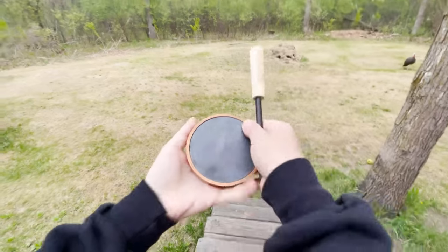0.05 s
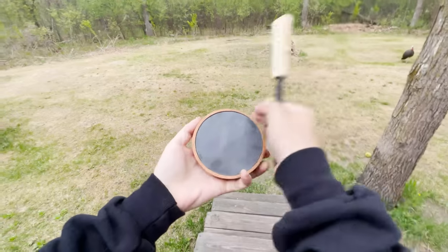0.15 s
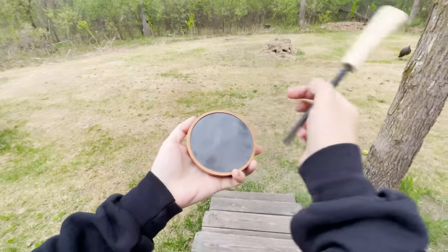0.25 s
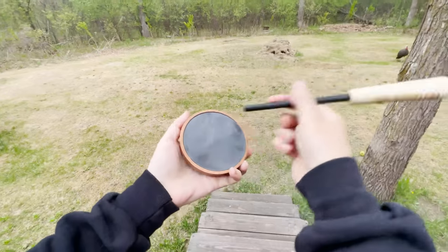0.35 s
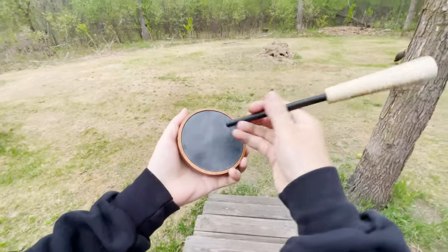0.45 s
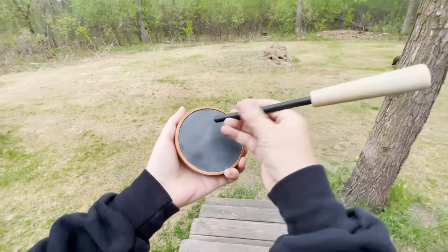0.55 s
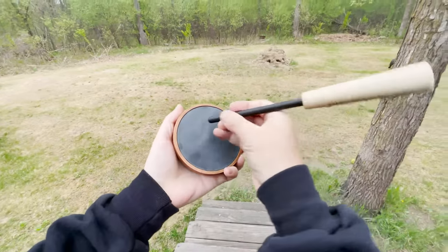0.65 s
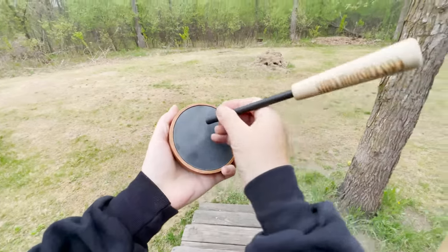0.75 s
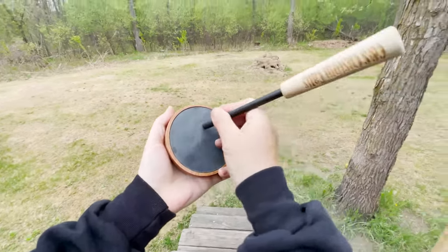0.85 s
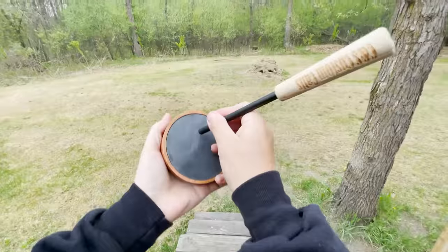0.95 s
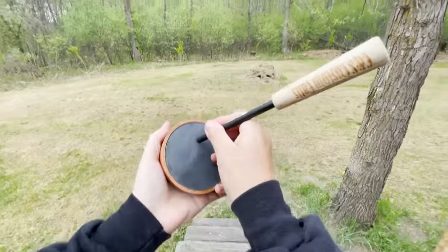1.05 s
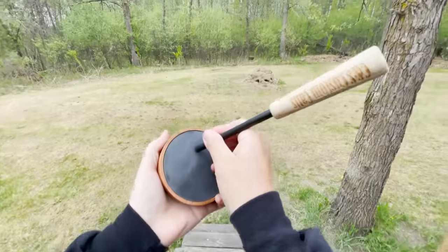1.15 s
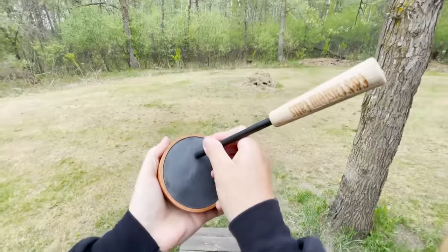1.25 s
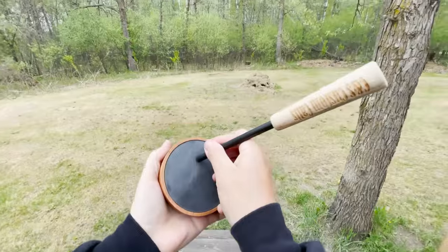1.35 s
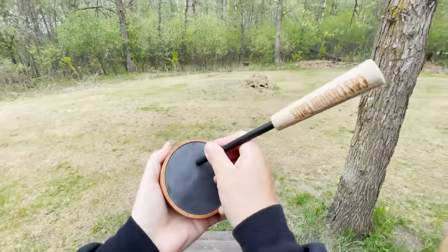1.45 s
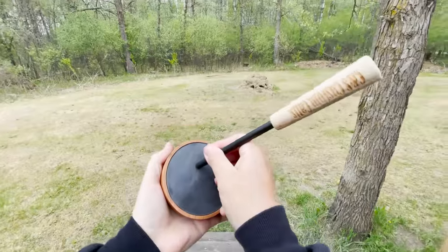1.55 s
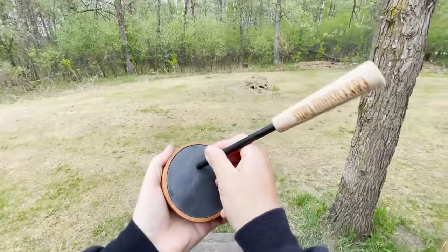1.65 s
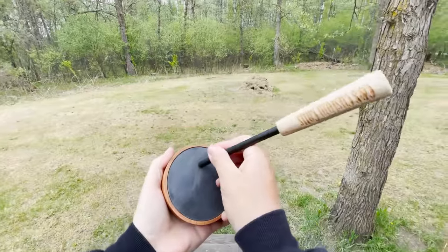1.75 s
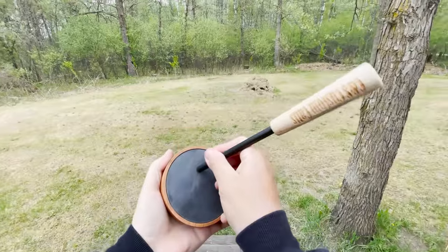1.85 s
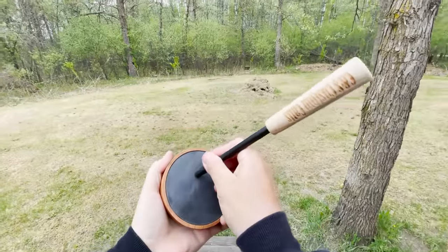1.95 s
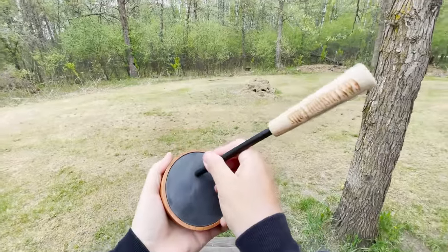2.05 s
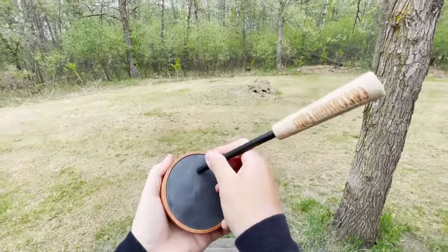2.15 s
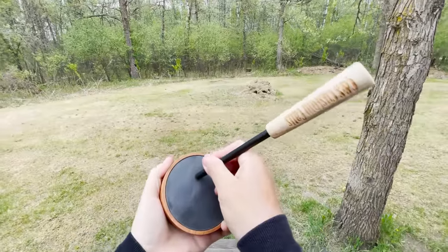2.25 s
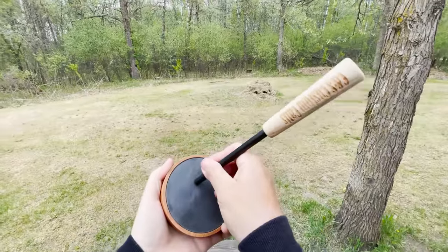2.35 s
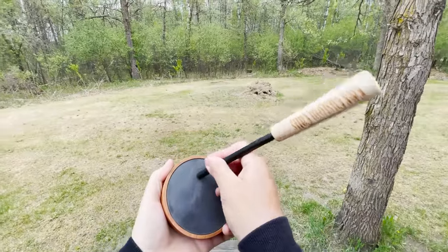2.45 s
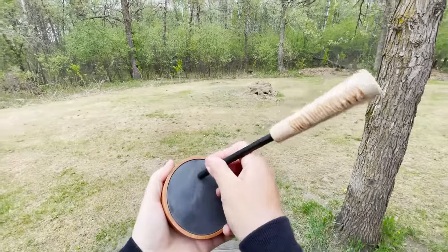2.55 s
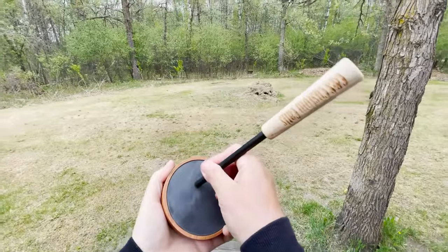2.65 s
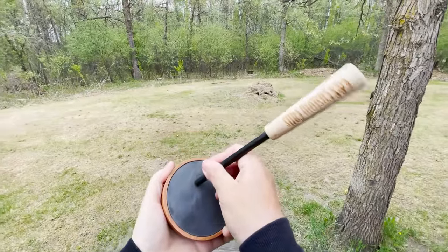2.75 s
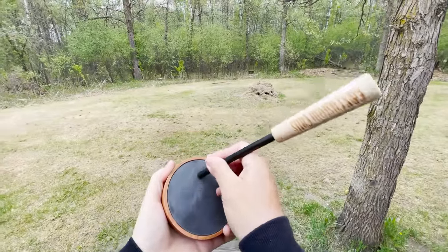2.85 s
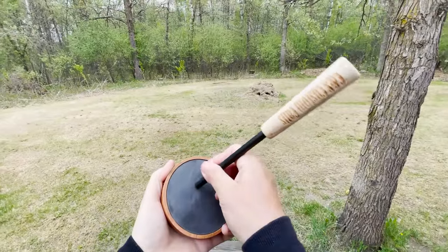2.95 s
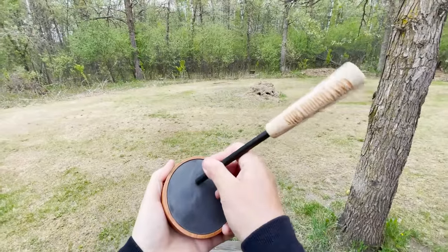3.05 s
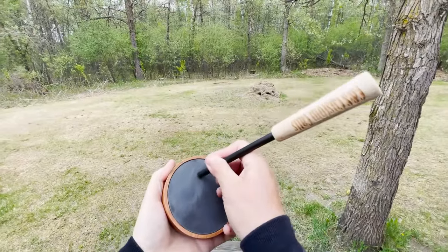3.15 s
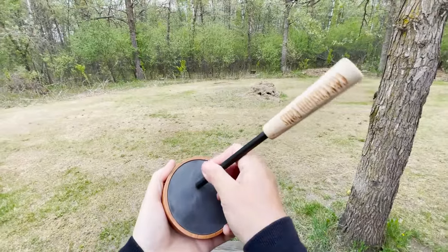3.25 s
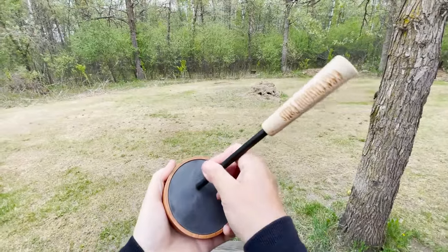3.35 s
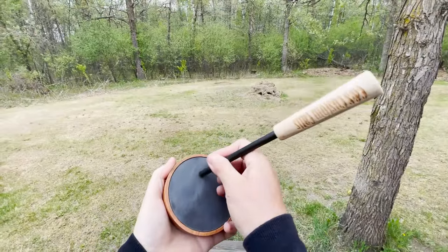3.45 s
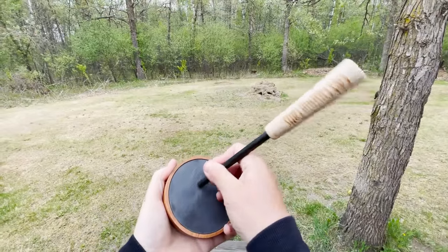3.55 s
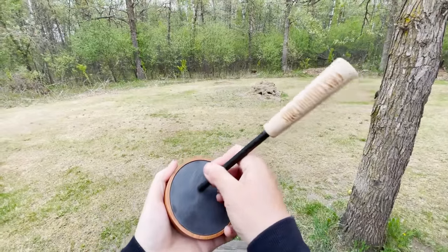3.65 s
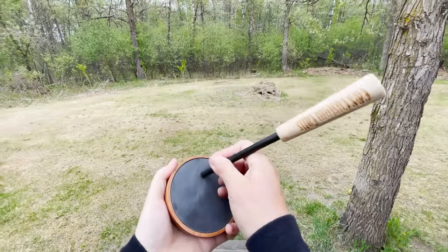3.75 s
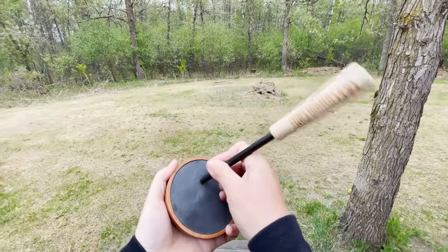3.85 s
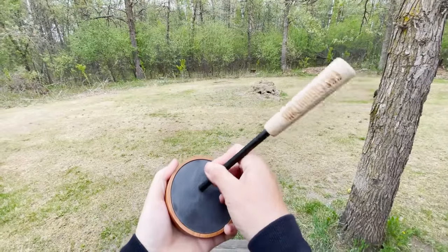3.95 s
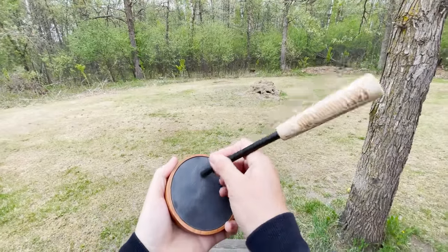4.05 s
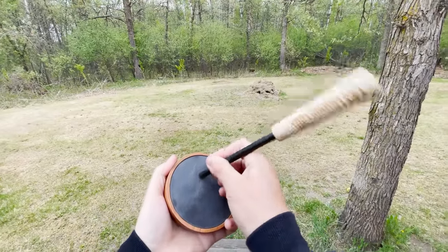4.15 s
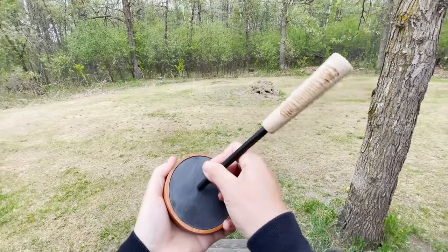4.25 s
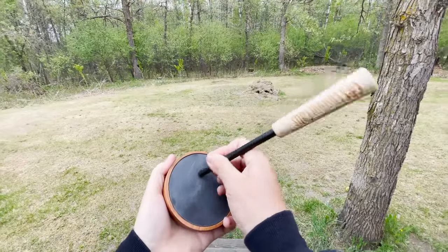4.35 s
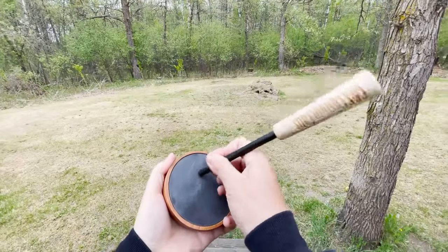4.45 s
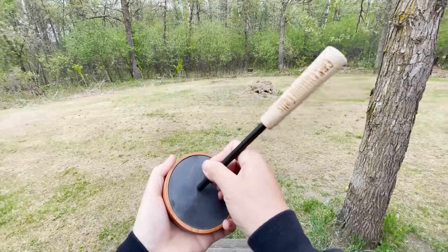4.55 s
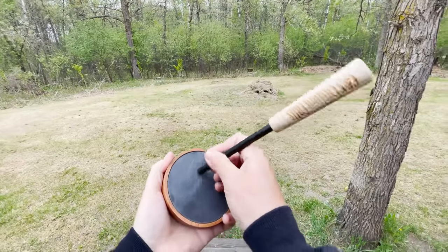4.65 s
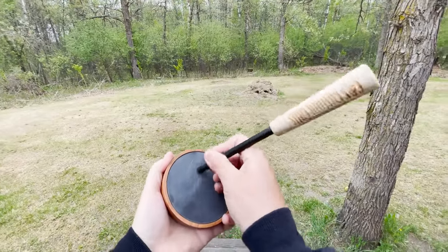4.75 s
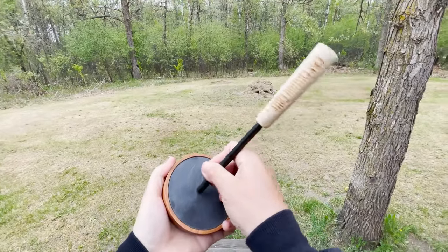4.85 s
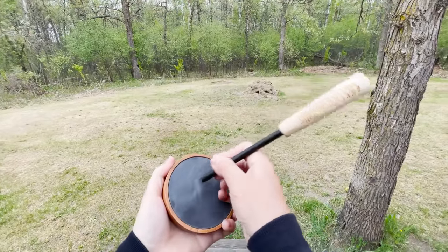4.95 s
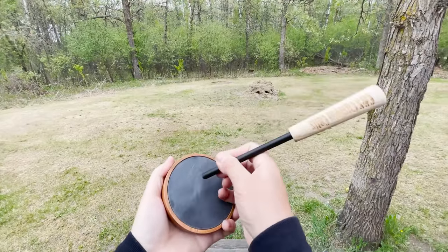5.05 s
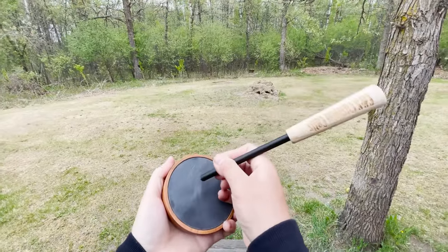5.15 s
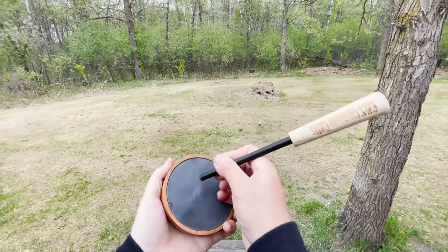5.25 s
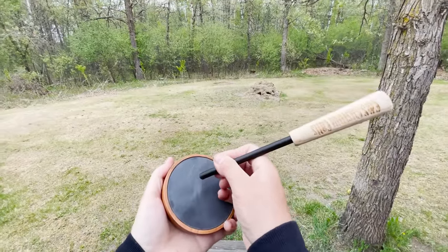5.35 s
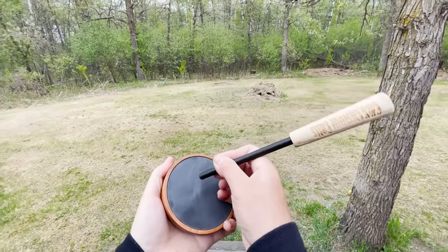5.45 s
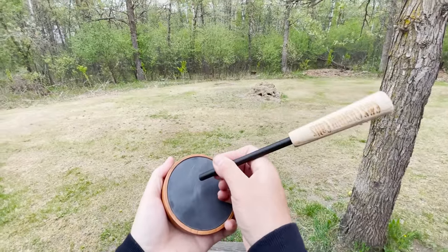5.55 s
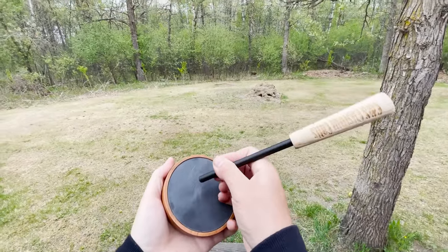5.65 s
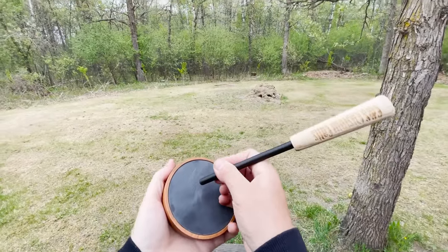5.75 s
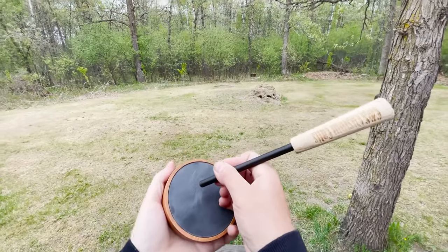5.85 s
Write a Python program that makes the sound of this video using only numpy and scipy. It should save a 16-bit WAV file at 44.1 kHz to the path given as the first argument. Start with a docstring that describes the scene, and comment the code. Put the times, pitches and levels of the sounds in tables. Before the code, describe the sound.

After faint brushing and a small tap, a friction turkey call yelps eleven times outdoors, each thin squeak breaking into a hoarse lower note.

```python
"""A wooden striker works a hand-held pot call in a quiet yard.
Skin and cloth brush as the grip is found, low wind and bumps touch the microphone, and the tip is set down.
Eleven turkey yelps follow, growing quicker and louder, by stick-slip friction driving the pot's resonances:
a thin high note breaks to a raspy lower one and flips up at the let-go; the tip hisses softly back between yelps.
Deck and trees return faint echoes; two faint far notes and a low drone come through at the end."""
import sys
import numpy as np
from scipy import signal
from scipy.fft import rfft, irfft
from scipy.io import wavfile

SR = 44100
rng = np.random.default_rng(int(sys.argv[2]) if len(sys.argv) > 2 else 0)


def put_to_file(sound):
    """Save the sound as 16-bit audio at rate SR, in the file named by the first command-line argument."""
    columns = np.atleast_2d(sound).T  # one column per channel
    safe = np.clip(columns, -1, 1)
    whole_steps = np.round(safe * 32767)
    wavfile.write(sys.argv[1], SR, whole_steps.astype(np.int16))


N = 260631
TIME, HZ = np.arange(N) / SR, np.fft.rfftfreq(N, 1 / SR)

# one stroke a yelp; the high note precedes the break, then the hand presses, holds and eases:
# break_s, high_note_s, press_s, hold_s, break_to_let_go_s, level_db, high_level_db, high_pitch_hz,
# rasp (0-1), hardness_db (steers the treble shelves)
YELPS = [(1.394, 0.0046, 0.039, 0.021, 0.16, -23, -37, 743, 0.63, -7),
         (1.818, 0.0099, 0.038, 0.011, 0.11, -17.5, -29, 853, 0.9, -8.5),
         (2.209, 0.023, .015, 0.021, 0.11, -16, -28, 935, .78, -10),
         (2.538, 0.019, .020, 0.062, 0.12, -16, -26.5, 959, 0.71, -7.5),
         (2.887, .027, 0.017, 0.032, 0.1, -14.5, -26, 915, .9, -4),
         (3.217, 0.019, 0.022, 0.011, 0.096, -13.5, -25.5, 975, 0.91, -3.3),
         (3.544, 0.019, .012, 0.018, 0.077, -12.5, -20.5, 988, 1, -0.5),
         (3.87, .034, 0.013, 0.009, 0.077, -12, -30, 1002, 0.86, -1),
         (4.179, .027, .012, 0.011, .068, -11.5, -23.5, 969, .8, 0.5),
         (4.486, .014, 0.0099, .018, 0.066, -12, -20.5, 945, 0.85, 0.5),
         (4.811, .024, 0.011, 0.027, 0.056, -12, -29.5, 956, 0.89, 0.5)]
# at full pressure the tip may catch in a slower cycle: middle_s, length_s, slip_rate_hz, rasp (0-1)
CATCHES = [(2.249, 0.024, 519, 0.17), (2.586, 0.018, 525.4, 0.3), (2.608, 0.0051, 561, 0.5),
           (2.626, 0.0087, 591, 0.4), (2.922, .008, 536.7, .44), (2.952, 0.0078, 586, 0.76),
           (3.264, 0.01, 607, 0.94), (3.592, 0.0096, 570, 0.4), (3.898, .008, 527, 0.3),
           (4.212, 0.0094, 535, 0.45), (4.51, 0.0094, 566.3, 1), (4.824, .006, 539.5, 0.64)]
# resonances of plate and pot: centre_hz, width_hz, relative_level_db
POT_MODES = [(467.4, 100, -9.5), (690, 260, -13), (1073, 107, 2.5), (1146, 60, -29.5), (1375, 170, -3),
             (1676, 234, 1.5), (1830, 71, 2), (1967, 122, 5.5), (2660, 240, -8), (2943, 200, -3),
             (3240, 310, -5), (3740, 380, -10), (4255, 360, -12.5), (4946, 340, -15), (6110, 320, -12.5),
             (6650, 670, -21), (8435, 1000, -24), (11125, 1050, -18.5), (15400, 600, -43.5)]
# paths from plate to the two microphones: frequency_hz, left_minus_right_db, left_lead_rad
MICROPHONE_PATHS = [(450.0, -0.2, -0.1), (660.0, -0.3, -0.1), (1060.0, 4.0, -0.8), (1370.0, -1.9, -1.4),
                    (1720.0, -0.9, -0.7), (1980.0, 2.3, -1.0), (2700.0, 0.8, -2.0), (3300.0, -4.4, -2.2),
                    (3740.0, -4.2, -2.0), (4300.0, -5.2, -2.9), (5000.0, 1.5, -5.6), (6150.0, -13.2, -6.7),
                    (6700.0, -7.3, -8.2), (8400.0, -8.7, -7.6), (10500.0, 0.0, -6.2), (11100.0, -0.5, -5.8),
                    (11700.0, -0.5, -5.0), (15400.0, 0.5, -6.3)]
# long ringing modes of the striker: pitch_hz, gain_at_resonance_db, t60_s
STRIKER_MODES = [(1350, -35, .3), (1705, -40, .3), (2688, -15, .35)]
# the tip sliding back: middle_s, length_s, peak_level_db
RETURNS = [(1.662, 0.14, -53), (2.06, 0.15, -51.5), (2.43, .14, -49), (2.766, 0.12, -49.5),
           (3.094, 0.14, -50.5), (3.419, 0.11, -48), (3.726, 0.15, -50.5), (4.036, 0.12, -50.5),
           (4.351, 0.17, -53), (4.652, .16, -51)]
# modes of the lightly touched plate: pitch_hz, relative_level_db, t60_s
TOUCH_MODES = [(600, -19, .04), (1060, -10, .04), (1165, -7, .04), (1690, -5, .025), (1865, 0, .042),
               (3050, -24, .02)]
# fingers and sleeves brushing: middle_s, length_s, centre_hz, peak_level_db
BRUSHES = [(0.029, 0.096, 6220, -57.5), (.425, 0.0045, 11300, -50), (.59, .14, 10400, -69.5)]
# spectrum of the yard's wash: frequency_hz, relative_level_db
YARD_COLOUR = [(50, -15.5), (120, -5.5), (250, -4), (400, -2), (950, -5), (1200, -12), (2200, -11.5),
               (3400, -13), (4900, -16), (5600, -20.5), (6200, -16), (6800, -22.5), (7400, -29),
               (8500, -28.0), (11200, -29.5), (12800, -40), (15800, -49.5)]
# level of the yard's wash: time_s, level_db
YARD_LEVEL = [(0, -55.5), (1.2, -54.5), (3, -54.5), (4.9, -57.5), (5.91, -56)]
# left-right likeness of the wash: frequency_hz, likeness (-1 to 1)
YARD_LIKENESS = [(60, -0.31), (180, 0.56), (550, 0.02), (1650, -0.31), (4970, -0.19), (15000, 0.19)]
# spectrum of wind on the microphone: frequency_hz, relative_level_db
WIND_COLOUR = [(12, -40.5), (20, -15), (40, -4), (59, 8.5), (140, -5), (170, -3), (220, -35.5), (370, -120)]
# a light breeze: time_s, level_db
BREEZE = [(0, -72.5), (2.5, -62), (3.5, -79.5), (4.8, -73.5), (5.9, -86)]
# gusts on top of the breeze: middle_s, length_s, peak_level_db
GUSTS = [(.25, 0.19, -74), (.85, 0.26, -61), (1.37, 0.52, -53), (1.69, 0.23, -54), (2.25, .7, -57),
         (4.53, .18, -55)]
# soft bumps of wind and handling: middle_s, length_s, peak_level_db
BUMPS = [(0.24, 0.047, -48.5), (1.28, 0.027, -42.5), (1.335, 0.039, -50), (1.4, 0.02, -38),
         (4.518, 0.064, -52), (4.83, .07, -61)]
# spectrum of the bumps: frequency_hz, relative_level_db
BUMP_COLOUR = [(20, -18), (55, -2.5), (100, -6), (200, -14), (400, -26), (1500, -70.5)]
# level of a far low drone: time_s, level_db
DRONE_LEVEL = [(0, -81), (4.9, -70.5), (5.35, -70.5), (5.5, -68), (5.7, -63), (5.91, -64)]
# faint far notes: middle_s, length_s, pitch_hz, peak_level_db
FAR_NOTES = [(5.32, .13, 1590, -66), (5.43, .07, 1570, -69)]

# the thin high note fades in, sinks, and breaks down to the low one
SINK_HZ_PER_S, ATTACK_S, ATTACK_DB, BREAK_S = 4800, .007, -21, .011
# the low note starts sharp and settles, is dragged flat by chatter, and climbs as the hand eases
LOW_HZ, SHARP_HZ, SETTLE_S, CHATTER_HZ, CHATTER_POWER = 663.1, 38.4, .008, 33.76, 4
CLIMB_HZ, CLIMB_POWER = 21.14, 2.9
# level at the break and the let-go against full pressure; how level and rasp follow pressure
BREAK_DB, EASED_DB, LEVEL_POWER = -5.5, -7, 1.41
RASP_POWER, LIGHT_RASP = 2, .1  # LIGHT_RASP: rasp with no pressure
# as the hand lets go, the note flips up and dies
FLIP_HZ, FLIP_S, FLIP_POWER, FADE_DB_PER_S, RELEASE_S = 1023.2, .0125, 2.9, 1150.5, .024
CATCH_EDGE_S = .006
# rms judder in level at full rasp; rms treble spit before the shelves scale it; their middle rate
JUDDER_DB, SPIT_DB, JUDDER_HZ = 1.67, 1.55, 88.85
# treble accent just after the break, also before the shelves scale it
ACCENT_DB, ACCENT_AFTER_S, ACCENT_WIDTH_S = 1.5, .008, .016
TOUCH_AT_S, TOUCH_DB = 1.152, -31.5
CEILING, EDGE_HZ = .95, 15900  # amplitude limit; upper band edge


def yelp(row, response, grit_db=-18, scrape_db=-3, grit_decay=.2, bite_slope=1.0, loud_db=-16,
         rasp_db=-4.5, light_db=-29, round_db=-16):
    """Source-filter principle: stick-slip pulses and the grit of each slide excite the pot's resonances."""
    *motion, hardness_db = row
    t, level_db, hz, rasp = stroke(*motion)
    pulses, since_slip = slips(hz, rasp)
    # grit is strongest just after a slip; grit_decay is in cycles
    grit = evened((0.065 + np.exp(-since_slip / grit_decay)) * rng.standard_normal(len(t)))
    # the highest partials dissolve into scraping
    drive = shelf(pulses, 6000, db=-16.5)
    drive = drive + gain_of(grit_db) * grit + gain_of(scrape_db) * treble(grit, 3500)

    # a harder stroke sharpens each slip, up to a limit; a chattering tip loses contact and scrapes less
    bite_db = hardness_db + bite_slope * np.minimum(level_db - loud_db, 0) + rasp_db * rasp
    since_accent = t - row[0] - ACCENT_AFTER_S
    bite_db += ACCENT_DB * np.exp(-(since_accent / ACCENT_WIDTH_S) ** 2)
    bite_db += SPIT_DB * waver(t, JUDDER_HZ)
    drive = shelf(drive, 2400, 0.84 * bite_db + 1.5)
    drive = shelf(drive, 11000, 1.8 * bite_db)
    # hard chatter also shakes the whole pot
    drive = shelf(drive, 430, -2.2 * rasp * np.maximum(hardness_db, 0))
    # a very light touch rounds the slips to a near sine
    lightness = np.clip((light_db - level_db) / 7, 0, 1)
    drive = shelf(drive, 1200, round_db * lightness)

    sound = through(drive, response)
    # level the short-time power, then impose the stroke's own level
    window = signal.windows.hann(600)
    power = np.convolve((sound ** 2).mean(0), window / window.sum(), "same")
    level = gain_of(level_db + JUDDER_DB * rasp * waver(t, JUDDER_HZ))
    fade = signal.windows.tukey(len(t), .05)
    return t[0], sound / np.sqrt(power + 1e-12) * level * fade


def stroke(at, high_s, press_s, hold_s, length, db, high_db, high_hz, full_rasp):
    """Friction control: hand pressure governs the level, slip rate and rasp of one stroke."""
    t = np.arange(-high_s, length + RELEASE_S, 1 / SR)  # zero at the break
    ease_s = max(length - press_s - hold_s, .005)
    pressure = np.clip(np.minimum(t / press_s, (length - t) / ease_s), 0, 1)
    high = np.clip(-t / BREAK_S, 0, 1)  # share of the high note
    begun, let_go = t + high_s, np.maximum(t - length, 0)  # seconds since each

    level_db = db + np.where(t < press_s, BREAK_DB, EASED_DB) * (1 - pressure) ** LEVEL_POWER
    level_db += high * (high_db - level_db)
    level_db += ATTACK_DB * np.maximum(1 - begun / ATTACK_S, 0) - FADE_DB_PER_S * let_go

    rasp = LIGHT_RASP + (full_rasp - LIGHT_RASP) * pressure ** RASP_POWER
    hz = LOW_HZ + SHARP_HZ * np.exp(-np.maximum(t, 0) / SETTLE_S)
    hz -= CHATTER_HZ * abs(rasp) ** CHATTER_POWER
    hz += CLIMB_HZ * (t > press_s) * (1 - pressure) ** CLIMB_POWER
    flip = np.minimum(let_go / FLIP_S, 1) ** FLIP_POWER
    hz += high * (high_hz - SINK_HZ_PER_S * begun - hz) + (FLIP_HZ - hz) * flip

    for middle, span, slow_hz, slow_rasp in CATCHES:
        caught = np.clip(.5 + (span / 2 - abs(at + t - middle)) / CATCH_EDGE_S, 0, 1)
        hz = hz + caught * (slow_hz - hz)
        rasp = rasp + caught * (slow_rasp - rasp)
    return at + t, level_db, hz, np.clip(rasp, 0, 1)


def slips(hz, rasp, jitter=0.11, uneven=.5, scatter=0.059, lurch=0.12, count=256):
    """Stick-slip oscillation: irregular band-limited force pulses, and each sample's phase in its cycle."""
    turns, sample = np.cumsum(hz) / SR, np.arange(len(hz))
    slip = np.arange(1, int(turns[-1]))
    rough = np.clip(np.interp(slip, turns, rasp), .06, 1)
    # long and short slips nearly alternate
    swing = rough * unrest(count, turn=.44, memory=.9)[slip]
    # pressed hard, the tip also drags and catches up
    drag = rough ** 2 * unrest(count, turn=.14, memory=.8)[slip]
    stray = rough * rng.standard_normal(count)[slip]
    slip_turn = slip + jitter * swing + lurch * drag + scatter * stray
    at = np.sort(np.interp(slip_turn, turns, sample))
    force = np.exp(uneven * np.tanh(swing))  # a longer stick stores more force
    offset = sample[:, None] - at
    pulses = (np.sinc(offset) * (abs(offset) < 20)) @ force
    return evened(pulses), np.interp(sample, at, slip) % 1


def unrest(count, turn, memory):
    """Damped random oscillation: a two-pole recursion advances by a fraction of a turn from slip to slip."""
    r = np.clip(memory, 0, .97)
    kicks = rng.standard_normal(2 * count)
    swing = signal.lfilter([1], [1, -2 * r * np.cos(2 * np.pi * turn), r * r], kicks)
    return evened(swing[count:])


def waver(t, rate_hz, count=16):
    """Superposition: sines from half to twice a rate sum to a random wobble of rms 1."""
    spread, phase = rng.random((2, count, 1))
    rates = rate_hz * 2 ** (2 * spread - 1)
    return evened(np.sin(2 * np.pi * (rates * t + phase)).sum(0))


def pot_response(skirt=1.767, leak_db=-46, size=2048):
    """Modal resonance: minimum-phase impulse response of the pot, with level and phase for each microphone."""
    hz = np.fft.rfftfreq(size, 1 / SR)
    power = sum(gain_of(db) ** 2 / (1 + (2 * (hz - f) / width) ** 2) ** skirt
                for f, width, db in POT_MODES)
    power = power + gain_of(leak_db) ** 2 / (1 + (hz / 7500) ** 10)
    radiation = hz ** 2 / (hz ** 2 + 230 ** 2)  # a small pot radiates little bass
    log_gain = np.log(np.sqrt(power) * radiation + 1e-4)
    # minimum phase follows from the log gain by the Hilbert transform
    phase = -signal.hilbert(np.r_[log_gain, log_gain[-2:0:-1]]).imag[:len(hz)]
    centre, pan_db, lead = np.transpose(MICROPHONE_PATHS)
    side = np.array([[.5], [-.5]])
    paths = gain_of(side * np.interp(hz, centre, pan_db)) * np.exp(1j * side * np.interp(hz, centre, lead))
    # time zero sits mid-buffer, as the centred convolution expects
    return np.roll(irfft(np.exp(log_gain + 1j * phase) * paths), size // 2, axis=1)


def through(x, response):
    """Linear filtering: a force on the plate is convolved with the pot's response."""
    return signal.fftconvolve(np.array([x, x]), response, "same", axes=1)


def striker(x):
    """Sympathetic resonance: narrow modes of the rod ring on after each stroke."""
    t = np.arange(SR // 2) / SR
    ring = 0
    for hz, db, t60 in STRIKER_MODES:
        unit_gain = 2 * np.log(1000) / (t60 * SR)
        ring = ring + gain_of(db - 60 * t / t60) * np.sin(2 * np.pi * hz * t) * unit_gain
    return signal.fftconvolve(x, ring[None], axes=1)[:, :N]


def sliding_hiss(response, bright_db=13):
    """Sliding friction: without pressure there are no slip cycles, only grit noise through the pot."""
    grit = rng.standard_normal(N)
    hiss = evened(through(grit + gain_of(bright_db) * treble(grit, 6100), response))
    return hiss * swells(RETURNS)


def touch(rise=0.00091):
    """Impulse excitation: a light knock of the tip sets off decaying plate modes (rise in s)."""
    t = np.arange(SR // 5) / SR
    ring = sum(gain_of(db - 60 * t / t60) * np.sin(2 * np.pi * hz * t) for hz, db, t60 in TOUCH_MODES)
    return TOUCH_AT_S, gain_of(TOUCH_DB) * ring * (1 - np.exp(-t / rise))


def echo(x, db, t60, dull_hz, delay):
    """Multiple reflection: sparse random-sign taps, low-passed and decaying, follow after a delay in s."""
    t = np.arange(SR) / SR
    signs = rng.choice([-1., 1.], (2, SR))
    present = rng.random((2, SR)) < 2000 / SR  # about 2000 reflections a second
    taps = signs * present * (t > delay) * gain_of(-60 * t / t60)
    low_pass = signal.butter(2, dull_hz, fs=SR, output="sos")
    taps = signal.sosfilt(low_pass, taps / np.linalg.norm(taps[0]))
    return gain_of(db) * signal.fftconvolve(x, taps, axes=1)[:, :N]


def brushes():
    """Rubbing friction: skin and cloth give short broad bands of noise."""
    return sum(gain_of(db) * swell(s, length) * noise([(hz / 6, -25), (hz, 0), (hz * 2.6, -20)], 0.31)
               for s, length, hz, db in BRUSHES)


def outdoors():
    """Random noise fields: the yard's wash, with low-frequency wind and bumps on the microphone."""
    wash = noise(YARD_COLOUR, read(YARD_LIKENESS, HZ)) * gain_of(np.interp(TIME, *np.transpose(YARD_LEVEL)))
    breeze = gain_of(np.interp(TIME, *np.transpose(BREEZE)))
    wind = noise(WIND_COLOUR, -.5) * (breeze + swells(GUSTS))
    bumps = noise(BUMP_COLOUR, -.3) * swells(BUMPS)
    return wash + wind + bumps


def distance():
    """Narrow-band noise: a low drone and two faint notes from far away."""
    colour = [(45, -36.0), (72, -2), (88, 4.0), (130, -31.0), (400, -91.5)]  # frequency_hz, relative_level_db
    drone = noise(colour, 0.6) * gain_of(np.interp(TIME, *np.transpose(DRONE_LEVEL)))
    notes = sum(gain_of(db) * swell(s, length) * noise([(hz * 0.76, -70), (hz, 0), (hz * 1.5, -70)], 0.56)
                for s, length, hz, db in FAR_NOTES)
    return drone + notes


def noise(colour, same=0.):
    """Spectral shaping and coherence: stereo noise of a given spectrum and left-right likeness, rms 1."""
    a, b = rfft(rng.standard_normal((2, N)))
    same = np.clip(same, -1, 1)
    pair = np.array([a, same * a + np.sqrt(1 - same ** 2) * b])
    return evened(irfft(pair * gain_of(read(colour, HZ)), N))


def swell(middle, length):
    """Amplitude envelope: one smooth squared-cosine rise and fall."""
    return np.cos(np.pi * np.clip((TIME - middle) / length, -.5, .5)) ** 2


def swells(rows):
    """Superposed envelopes from rows of middle_s, length_s, peak_level_db."""
    return sum(gain_of(db) * swell(s, length) for s, length, db in rows)


def shelf(x, corner_hz, db):
    """Shelving filter: raises or lowers everything above a corner; db may be a curve."""
    return x + (gain_of(db) - 1) * treble(x, corner_hz)


def treble(x, corner_hz):
    """Zero-phase high-pass: the part of x above a corner, without delay."""
    return signal.sosfiltfilt(signal.butter(2, corner_hz, "high", fs=SR, output="sos"), x)


def gain_of(db):
    """Decibel law: level to amplitude."""
    return 10 ** (np.asarray(db) / 20)


def evened(x):
    """Power normalisation: scales to rms 1."""
    return x / np.sqrt(np.mean(x ** 2) + 1e-20)


def read(points, hz):
    """Log-frequency interpolation of (frequency_hz, value) points."""
    f, value = np.transpose(points)
    return np.interp(np.log(hz + 1), np.log(f + 1), value)


def add(mix, s, sound):
    """Superposition: mixes a sound in at time s, in seconds."""
    part = mix[..., round(s * SR):][..., :sound.shape[-1]]
    part += sound[..., :part.shape[-1]]


def scene():
    """Superposition of the call close by, reflections from the deck and the trees, and the yard."""
    response, call = pot_response(), np.zeros((2, N))
    for row in YELPS:
        add(call, *yelp(row, response))
    add(call, *touch())
    call += sliding_hiss(response)
    call += striker(call)
    scattered = shelf(call, 2400, db=3.5)  # small things nearby scatter the treble best
    deck = echo(scattered, db=-26, t60=0.06, dull_hz=9000, delay=0.0099)
    trees = echo(scattered, db=-37.5, t60=1.0, dull_hz=3470, delay=0.03)
    return call + deck + trees + brushes() + outdoors() + distance()


def record(dry):
    """Soft saturation rounds off the very highest peaks; a linear-phase low-pass then limits the band."""
    rounded = dry / (1 + (dry / CEILING) ** 8) ** (1 / 8)
    low_pass = signal.firwin(511, EDGE_HZ, window=("kaiser", 9), fs=SR)
    return signal.oaconvolve(rounded, low_pass[None], "same")


dry = scene()
out = record(dry)
put_to_file(out)
```